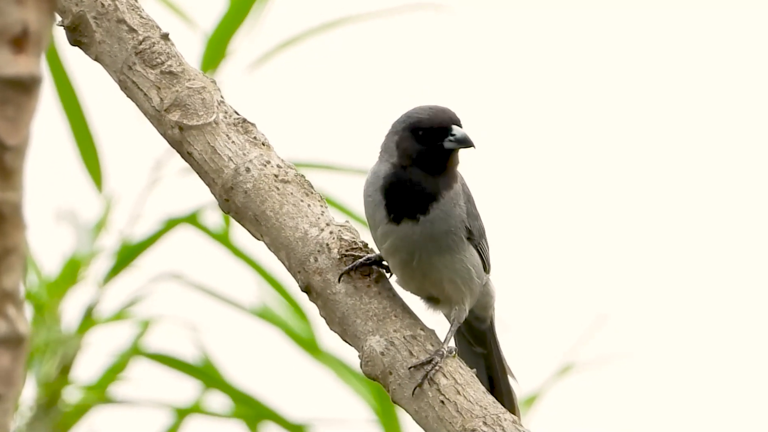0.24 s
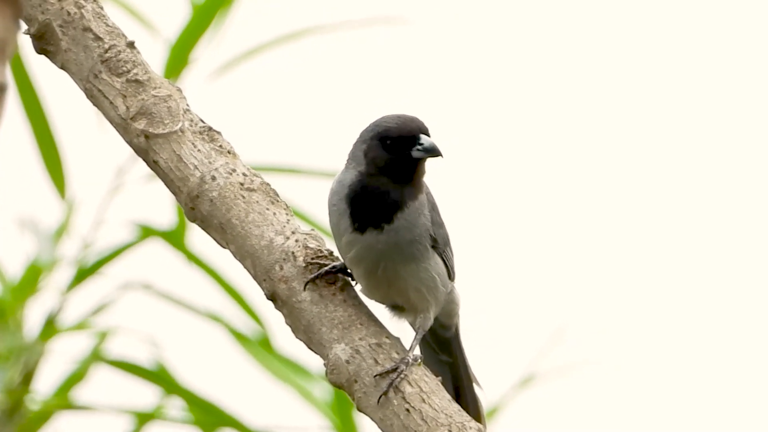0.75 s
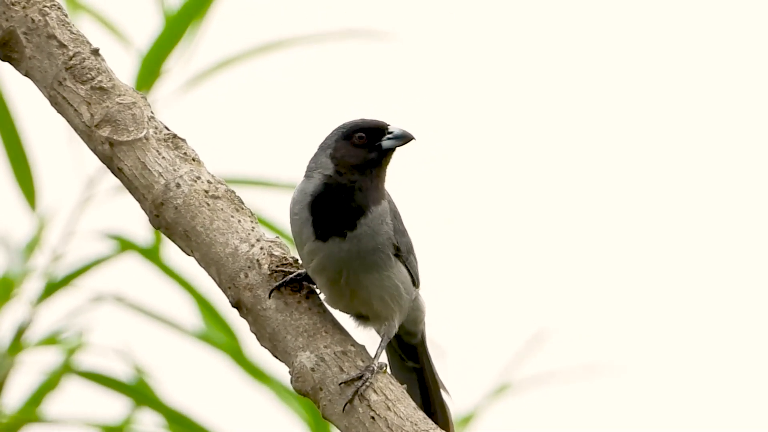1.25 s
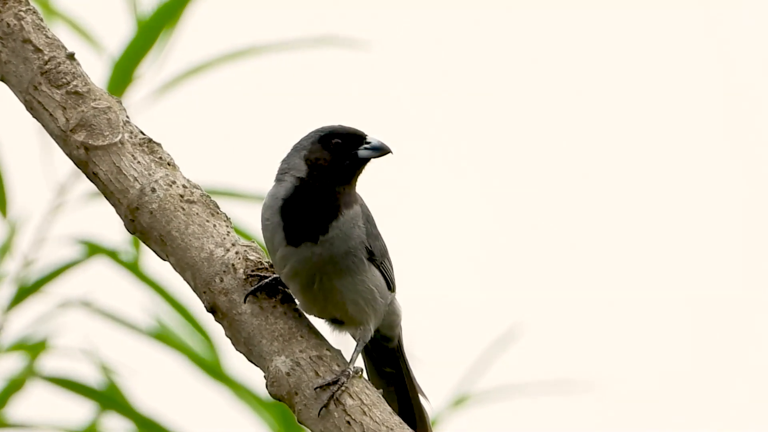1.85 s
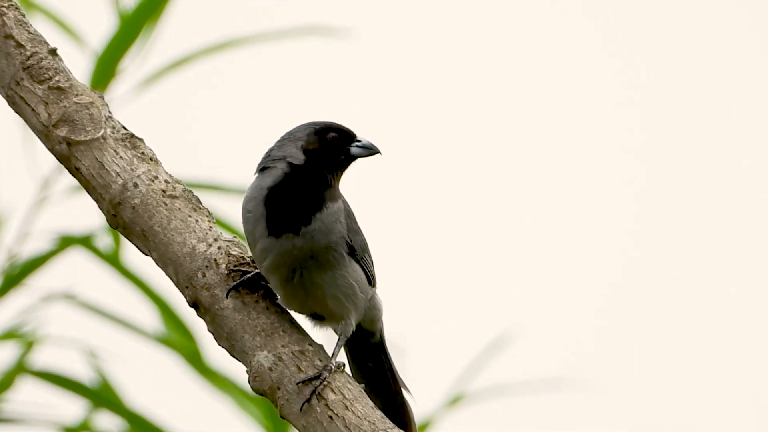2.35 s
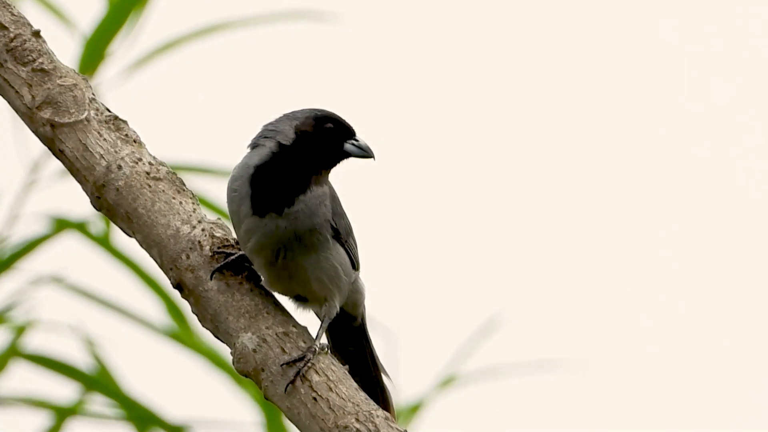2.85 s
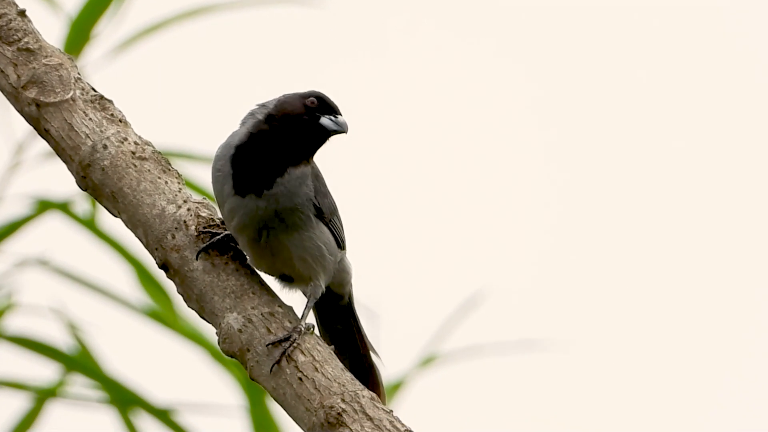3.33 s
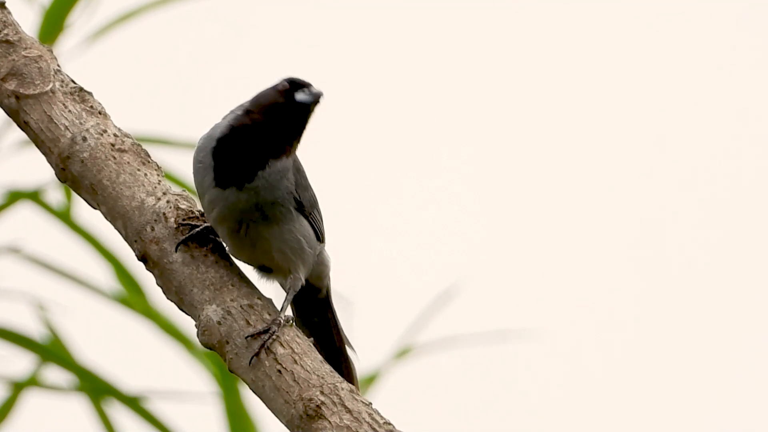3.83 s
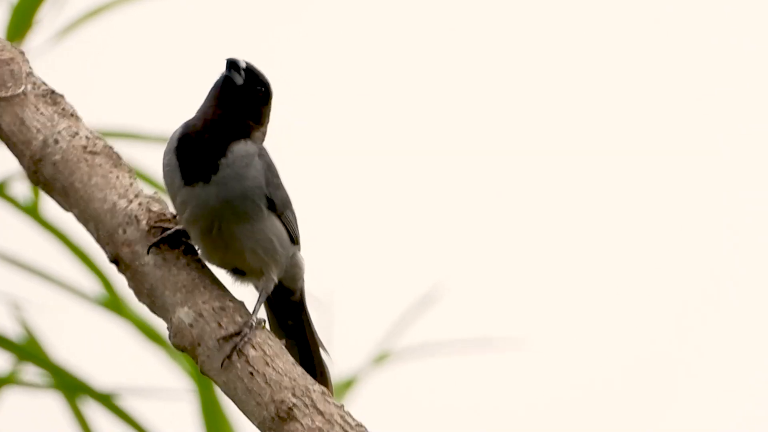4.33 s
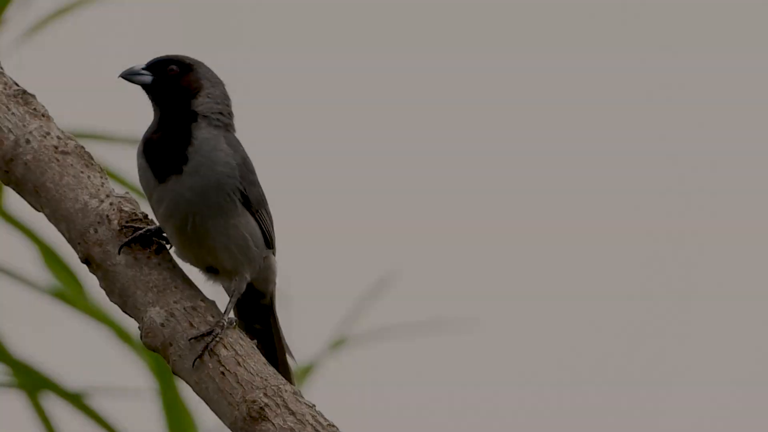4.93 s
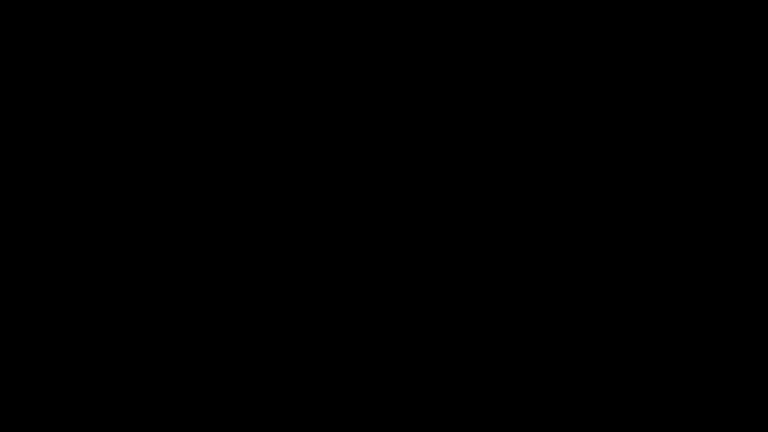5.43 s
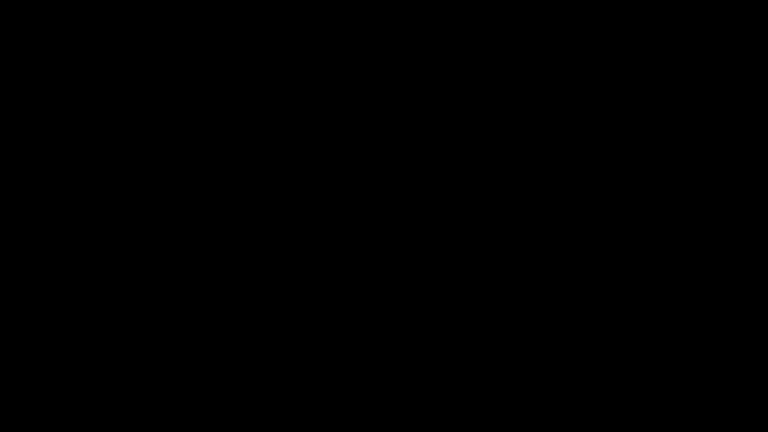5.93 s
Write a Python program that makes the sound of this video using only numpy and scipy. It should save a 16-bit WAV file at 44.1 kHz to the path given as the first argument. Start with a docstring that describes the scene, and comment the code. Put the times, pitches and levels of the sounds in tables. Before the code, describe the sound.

A small bird on the left whistles sweet gliding notes with tree echoes, framed by squawking, squeaking thicket chatter over insects and airy hiss.

```python
"""A small bird on a branch to the left whistles gliding near-sine notes, with echoes off the trees around it.
Before and after its song the left side has thicket sounds: hooked calls, whistles, squeaks, squawks, knocks.
Farther birds whistle, buzz and trill over pulsed-noise and whistled insects and coloured-noise air hiss;
the hiss changes abruptly on each side, and the loudest insect chorus fades away near the end."""
import sys
import numpy as np
from scipy import signal
from scipy.fft import rfft, irfft
from scipy.io import wavfile
from scipy.ndimage import uniform_filter1d

SR = 44100
rng = np.random.default_rng(int(sys.argv[2]) if len(sys.argv) > 2 else 0)


def generate_wav(sig):
    """Save sig (samples, or channels by samples) to the path in sys.argv[1] as 16-bit PCM at SR."""
    pcm = np.round(np.clip(np.atleast_2d(sig).T, -1, 1) * 32767).astype(np.int16)
    wavfile.write(sys.argv[1], SR, pcm)


N = 272538

GLADE_FROM_S, GLADE_TO_S = 1.232, 5.562  # left side: glade between these, thicket outside
RIGHT_CHANGE_S = 5.693
LEFT_LAG_SAMPLES = 2  # far field reaches the left later
OVERTONE_AT_HZ, OVERTONE_DB_PER_KHZ = 2100, -66


def near_bird():
    """Near-sine glides with a weak octave, echoed by the trees."""
    # song, a five-note motif comes twice: shape, start/s, time stretch, pitch ratio, peak/dB
    song_notes = [("climb", 1.312, 1.0, 1.0, -15), ("slide", 1.632, 1.0, 1.0, -17.5),
                  ("arch", 2.013, .945, 1.006, -13), ("low hop", 2.453, 1.01, 1.001, -19),
                  ("high hop", 2.594, .98, 1.004, -11.5), ("bow", 2.811, .825, 1.023, -12.5),
                  ("vee", 3.114, 1.0, 1.018, -9.5), ("lift", 3.343, 1.0, 1.0, -14.5),
                  ("dip", 3.507, 1.0, 1.0, -12.5), ("long slide", 3.721, 1.0, 1.0, -10),
                  ("arch", 4.113, 1.0, 1.0, -10), ("low hop", 4.591, 1.0, 1.0, -16.5),
                  ("high hop", 4.731, 1.02, .996, -8), ("bow", 4.908, 1.005, .997, -8),
                  ("vee", 5.252, 1.005, .985, -7.5)]
    # hard echoes: delay/s, level/dB
    echo_rows = [(.006, -12.5), (.03, -24), (.1, -33.5)]
    overtone_db = -34  # at OVERTONE_AT_HZ
    dry_song = whistle(sung(song_notes), .0025, overtone_db, wobble_hz=7)
    return trees(dry_song, -19.5, .55, echo_rows)


def thicket():
    """Calls, coos, chatter and squeaks scattered by leaves; squawks and knocks added dry."""
    # hooked calls: shape, start/s, time stretch, pitch ratio, peak/dB
    hook_notes = [("hook", .036, .7, 1.04, -33), ("hook", .41, 1.0, 1.0, -30.5)]
    # rough squeaks: centre t/s, first f/Hz, last f/Hz, length/s, level/dB
    squeak_rows = [(.158, 4000, 4850, .024, -35), (.35, 5750, 6150, .06, -35), (.41, 6400, 6800, .07, -40),
                   (.428, 7600, 9050, 0.066, -32), (.375, 11400, 13400, 0.093, -53),
                   (.438, 2000, 2750, .012, -33), (.925, 2900, 4500, .018, -35),
                   (.915, 5750, 6120, .06, -48), (1.222, 4900, 6200, .014, -35),
                   (5.571, 3600, 4150, .014, -38), (5.61, 4900, 4300, .025, -40),
                   (5.748, 4600, 3600, .03, -39), (5.768, 4200, 3100, .014, -34),
                   (5.795, 2850, 2650, 0.045, -36), (5.881, 2400, 4000, .016, -38)]
    calls = whistle(whistled("thicket") + sung(hook_notes), .006, wobble_hz=18)
    coo = whistle(whistled("low coo"), .02)
    voices = trees(calls + coo + chatter(), -6, .25)
    squeaks = trees(blips(squeak_rows, wobble_hz=60), -3, .2)
    return voices + squeaks + squawks() + knocks()


def squawks():
    """Harsh calls: narrow noise bands with fast random level, each ringing out exponentially."""
    # onset t/s, level before band sum/dB, T60/s
    bursts = [(.003, -15.5, .08), (.016, -24, .42), (5.565, -34, .2), (5.755, -32, .3)]
    # centre f/Hz, width/Hz, relative level/dB
    bands = [(3870, 420, 1), (4930, 400, 1), (5400, 350, -2.5), (5900, 400, -5)]
    rasp = sum(undb(db + 2.5 * walk(150)) * band(hz, width_hz) for hz, width_hz, db in bands) / 2
    return rasp * sum(decay(s, db, t60_s) for s, db, t60_s in bursts)


def chatter(count=330):
    """Many thin chirps of small birds, random in time, pitch, bend, length and level."""
    when, high, bend, long, loud = rng.random((count, 5)).T
    first_hz = 1700 * 2 ** (1.6 * high)
    last_hz = first_hz * (.7 + .55 * bend)
    length_s = .012 + .04 * long
    level_db = -53 + 8 * loud
    return blips(zip(when * N / SR, first_hz, last_hz, length_s, level_db), wobble_hz=20)


def knocks():
    """Soft knocks of twigs: bell-band noise with a short exponential decay."""
    # onset t/s, level/dB
    taps = [(.24, -41), (.653, -38)]
    t60_s = .07
    return band(1000, 700) * sum(decay(s, db, t60_s) for s, db in taps)


def far_birds():
    """Whistles, wide-vibrato buzzes, a trill of falling chips and lone rising chips; left, right."""
    # buzzes: start/s, end/s, first f/Hz, last f/Hz, level/dB
    buzz_rows = [(0, 0.245, 2960, 2404, -45), (0.352, 0.636, 2750, 2750, -48),
                 (0.734, 1.026, 3244, 2626, -48), (1.322, 1.606, 3110, 2440, -51.5)]
    # lone contact chips: centre t/s, first f/Hz, level/dB
    chip_rows = [(.849, 8150, -41.5), (2.047, 8300, -46), (2.907, 8480, -39.5), (3.86, 7800, -45.5)]
    chip_rise_hz, chip_s = 190, .016
    buzz_notes = [[(a, f, db), (b, g, db)] for a, b, f, g, db in buzz_rows]
    buzz = whistle(buzz_notes, .0081, swing_hz=390, wobble_hz=50)
    chips = blips([(s, hz, hz + chip_rise_hz, chip_s, db) for s, hz, db in chip_rows])
    buzz_and_trill = buzz + far_trill()
    whistles = whistle(whistled("field"), .005)
    left = (whistles + buzz_and_trill * undb(-3) + chips * undb(-8)) * (clock() < RIGHT_CHANGE_S)
    right = whistles + whistle(whistled("right"), .005) + buzz_and_trill + chips
    return np.array([trees(left, -8, .25), trees(right, -8, .2)])


def far_trill():
    """Short falling chips at even gaps, the first few longer; level swells and sinks."""
    start_s, gap_s, count = 1.849, .05, 17
    holdback_s, settle_chips = .023, 1.8
    from_hz, to_hz, length_s = 3560, 3050, .009
    k = np.arange(count)
    beats_s = start_s + gap_s * k + holdback_s * (1 - np.exp(-k / settle_chips))
    level_db = -42 + 5 * np.sin(np.pi * k / k[-1]).clip(0) ** .5
    return blips([(s, from_hz, to_hz, length_s, db) for s, db in zip(beats_s, level_db)])


def insects():
    """Chorus, plus cricket and warble one sample later on the left; left, right."""
    high = cricket() + warble() * (clock() < RIGHT_CHANGE_S)
    return chorus() + np.array([np.roll(high, LEFT_LAG_SAMPLES // 2), high])


def chorus():
    """Band noise pulsed at a slightly wandering rate; left is part shared, part its own noise."""
    # t/s, level before pulsing and left-side mix/dB
    level_rows = [(0, -40), (.1, -48), (.62, -44), (1.1, -47), (1.3, -41), (1.38, -47), (2.85, -45.5),
                  (3.35, -49), (3.6, -41.5), (3.9, -48), (4.2, -43), (4.5, -54.5), (4.85, -67)]
    centre_hz, width_hz, rate_hz = 4633, 640, 126
    beat = 2 * np.pi * np.cumsum(rate_hz * (1 + .02 * walk(3))) / SR
    swell = undb(curve(level_rows)) * (1 + .24 * np.cos(beat))
    shared = band(centre_hz, width_hz)
    left = .58 * np.roll(shared, LEFT_LAG_SAMPLES) + .69 * band(centre_hz, width_hz)
    return swell * np.array([left, shared])


def cricket():
    """Evenly spaced constant-pitch chirps with random level scatter."""
    start_s, period_s, count = 1.3155, .0507, 27
    pitch_hz, length_s = 6770, .015
    starts_s = start_s + period_s * np.arange(count)
    level_db = -51 + .61 * rng.standard_normal(count)
    return blips([(s, pitch_hz, pitch_hz, length_s, db) for s, db in zip(starts_s, level_db)])


def warble():
    """Steady high FM tone, loudest at the top of each swing, cut off at the bottom."""
    rate_hz, centre_hz, swing_hz = 68.4, 8950, 590
    turn = np.cos(2 * np.pi * rate_hz * clock() + .13 * walk(3.4))
    pitch_hz = centre_hz + swing_hz * turn + 40 * walk(200)
    level_db = -60.5 + 2.5 * turn + 1.2 * walk(300)
    gate = np.clip(3 * (turn + 1), 0, 1)
    return np.sqrt(2) * undb(level_db) * gate * np.sin(2 * np.pi * np.cumsum(pitch_hz) / SR)


def side_hiss():
    """Coloured noise that switches abruptly: left thicket/glade/thicket, right air/breeze."""
    # colours: f/Hz, density/(dB per Hz)
    thicket_colour = [(30, -105), (70, -85), (200, -91.5), (400, -80.5), (1400, -83.5), (1650, -73.5),
                      (5800, -78.5), (6200, -86), (6600, -75.5), (8400, -84.5), (9100, -75), (9800, -94),
                      (10600, -104), (15500, -105)]
    glade_colour = [(300, -114), (1200, -88), (2200, -77.5), (3000, -79), (3550, -70.5), (4100, -84.5),
                    (6000, -95), (10200, -104), (10700, -125)]
    air_colour = [(30, -119), (65, -98), (300, -96), (1800, -94.5), (5600, -101), (6700, -90), (7700, -103),
                  (10200, -101), (10700, -125)]
    breeze_colour = [(400, -120), (1500, -90), (3400, -83.5), (5000, -88), (10000, -90.5), (15500, -96.5)]
    left = np.where(in_glade(), hiss(glade_colour), hiss(thicket_colour))
    right = np.where(clock() < RIGHT_CHANGE_S, hiss(air_colour), hiss(breeze_colour))
    return np.array([left, right])


def field_hiss():
    """Far-field noise, partly shared by both sides, that fades late."""
    # colour before fade and left-side mix: f/Hz, density/(dB per Hz)
    field_colour = [(1000, -110), (2000, -90), (3500, -97), (6400, -90.5), (7700, -98), (10300, -101),
                    (13500, -108), (15500, -118)]
    # fade: t/s, gain/dB
    fade_rows = [(4.2, 7.5), (4.75, -9), (5.2, -36)]
    shared = hiss(field_colour)
    left = .32 * np.roll(shared, LEFT_LAG_SAMPLES) + .5 * hiss(field_colour)
    return undb(curve(fade_rows)) * np.array([left, shared])


def sung(notes):
    """Place note shapes: stretch, transpose, set peak level."""
    # by name, rows of: t from note start/s, f/Hz, level re peak/dB
    shapes = { "climb": [(0, 2215, -25), (.042, 2147, -15.5), (.08, 2320, -8), (.151, 2840, -1.5),
              (.192, 3090, 0), (.204, 3020, -15)], "slide": [(0, 3045, -24), (.008, 3020, -14),
              (.059, 2650, -1), (.123, 2392, 0), (.212, 2017, -11)], "arch": [(0, 1395, -34),
              (.026, 2100, -22), (.041, 2260, -10), (.073, 2530, -1), (.11, 2720, 0), (.188, 3000, -3),
              (.228, 3065, -4.5), (.29, 2840, -0.5), (.314, 2715, -16)], "low hop": [(0, 1800, -22),
              (.034, 2076, 0), (.051, 2045, -1), (.09, 1740, -17)], "high hop": [(0, 2720, -13),
              (.017, 3015, -8), (.038, 2950, 0), (.066, 2570, -4), (.085, 2310, -27)],
              "bow": [(0, 2385, -17), (.036, 2412, -0.8), (.097, 2501, -1.5), (.155, 2380, -0.5),
              (.18, 2290, -5.5), (.232, 2075, -14), (.247, 2050, -11)], "vee": [(0, 3250, -12),
              (.009, 3530, -16), (.022, 3350, -9), (.038, 2880, -1.5), (.054, 2590, -1.5), (.074, 3060, 0),
              (.088, 3190, -3), (.097, 3130, -15)], "lift": [(0, 1947, -21), (.034, 1972, -7.5),
              (.086, 2205, 0), (.116, 2372, -4.5), (.125, 2410, -25)], "dip": [(.002, 2480, -18),
              (.016, 2790, 0), (.028, 2693, -4), (.042, 2310, -4.5), (.051, 1786, -29), (.061, 1810, -22),
              (.076, 2730, -4), (.087, 2970, -3), (.138, 3148, -1), (.15, 3163, -33)],
              "long slide": [(0, 3030, -20), (.043, 2690, -2.5), (.1, 2393, 0), (.153, 2160, -11),
              (.253, 1900, -18)], "hook": [(0, 1840, -10), (.035, 2300, 0), (.06, 2090, -1),
              (.11, 1816, -4), (.22, 1654, -12)]}
    return [[(start + s * stretch, hz * ratio, db + peak_db) for s, hz, db in shapes[shape]]
            for shape, start, stretch, ratio, peak_db in notes]


def whistled(place):
    """Whistles of one place or voice: swell to the turn, fade after it."""
    # place or voice, start/s, turn/s, end/s, first f/Hz, turn f/Hz, last f/Hz, peak/dB
    whistle_rows = [ ("thicket", .16, .165, .19, 3900, 3880, 3800, -33),
                    ("low coo", .15, .33, .4, 582, 575, 570, -51),
                    ("thicket", .79, .83, .85, 1780, 1950, 2050, -42),
                    ("thicket", .645, .65, .67, 1870, 1900, 1970, -34),
                    ("thicket", 1.12, 1.18, 1.2, 1716, 1900, 1996, -38),
                    ("thicket", 5.63, 5.7, 5.72, 1650, 1950, 2035, -41),
                    ("thicket", 5.65, 5.7, 5.73, 3400, 4200, 4600, -42),
                    ("thicket", 5.84, 5.85, 5.87, 5550, 5100, 4400, -42),
                    ("thicket", 5.915, 5.94, 5.99, 5000, 3700, 2980, -37),
                    ("thicket", 5.97, 5.988, 6.0, 4850, 4650, 4550, -42),
                    ("thicket", 6.06, 6.09, 6.1, 2830, 3050, 3120, -38),
                    ("thicket", 6.07, 6.1, 6.13, 1700, 1850, 1920, -40),
                    ("thicket", 6.11, 6.125, 6.14, 3770, 3750, 3740, -39),
                    ("thicket", 6.15, 6.16, 6.178, 3900, 3500, 2790, -37),
                    ("thicket", 6.13, 6.16, 6.18, 5400, 4750, 4400, -41),
                    ("field", .07, .12, .13, 4880, 4820, 4800, -41.5),
                    ("right", .27, .34, .36, 4970, 4800, 4770, -40),
                    ("right", .41, .5, .52, 6700, 5750, 5580, -47),
                    ("field", .66, .76, .8, 6450, 6650, 6250, -46),
                    ("field", .8, .87, .885, 6250, 5720, 5680, -43),
                    ("field", .975, 1.0, 1.035, 5450, 5090, 5080, -39),
                    ("right", 1.11, 1.15, 1.19, 2490, 3500, 2970, -46),
                    ("field", 1.715, 1.745, 1.785, 2790, 3430, 3130, -43.5),
                    ("right", 5.8, 5.834, 5.884, 1774, 1960, 1950, -40.5),
                    ("right", 5.972, 6.0, 6.125, 3240, 2920, 1884, -25),
                    ("right", 6.01, 6.096, 6.124, 5600, 4230, 3800, -45)]
    swell_db, fall_db_per_s = 8, 125
    return [[(a, f, db - swell_db), (b, g, db), (c, h, db - fall_db_per_s * (c - b))]
            for where, a, b, c, f, g, h, db in whistle_rows if where == place]


def whistle(notes, edge_s, overtone_db=-np.inf, swing_hz=0, wobble_hz=0):
    """Near-sine notes: integrated pitch, soft edges, optional vibrato and random pitch wobble."""
    vibrato_hz = 112
    out, wobble = np.zeros(N), walk(300)
    for note in notes:
        s, hz, db = np.transpose(note)
        first = max(int((s[0] - edge_s) * SR), 0)
        last = min(int((s[-1] + edge_s) * SR), N)
        at = np.arange(first, last)
        t = at / SR
        vibrato = swing_hz * np.sin(2 * np.pi * vibrato_hz * t)
        pitch_hz = glide(t, s, hz) + vibrato + wobble_hz * wobble[at]
        phase = 2 * np.pi * np.cumsum(pitch_hz) / SR
        edge = np.clip(np.minimum(t - s[0], s[-1] - t) / (2 * edge_s) + .5, 0, 1)
        # sqrt(2): levels are rms
        loud = np.sqrt(2) * undb(np.interp(t, s, db)) * np.sin(np.pi / 2 * edge) ** 2
        # lower pitch, stronger octave
        octave = undb(overtone_db + OVERTONE_DB_PER_KHZ * (pitch_hz - OVERTONE_AT_HZ) / 1e3)
        out[at] += loud * (np.sin(phase) + octave * np.sin(2 * phase))
    return out


def blips(rows, wobble_hz=0):
    """Short glides from rows of centre t/s, first f/Hz, last f/Hz, length/s, level/dB."""
    notes = [[(s - d / 2, a, db), (s + d / 2, b, db)] for s, a, b, d, db in rows]
    return whistle(notes, .0019, wobble_hz=wobble_hz)


def glide(t, s, hz):
    """Smooth cubic through (s, hz), level at interior turning points."""
    step = np.diff(hz) / np.diff(s)
    before, after = np.r_[step[0], step], np.r_[step, step[-1]]
    # harmonic mean of neighbouring slopes, zero where they differ in sign
    slope = np.where(before * after > 0, 2 * before * after / (before + after + 1e-9), 0)
    k = np.clip(np.searchsorted(s, t) - 1, 0, len(s) - 2)
    gap = np.diff(s)[k]
    u = np.clip((t - s[k]) / gap, 0, 1)
    bow = (slope[k] - step[k]) * (1 - u) - (slope[k + 1] - step[k]) * u
    return hz[k] + gap * u * (step[k] + bow * (1 - u))


def trees(x, wet_db, t60_s, echoes=()):
    """Direct sound, hard echoes and a diffuse tail scattered by trunks and leaves."""
    t = np.arange(SR // 2) / SR
    tail = rng.standard_normal(len(t)) * undb(-60 * t / t60_s)
    path = undb(wet_db) * tail / np.sqrt(np.sum(tail ** 2))
    path[0] = 1
    for delay_s, db in echoes:
        path[int(delay_s * SR)] += undb(db)
    return signal.fftconvolve(x, path)[:N]


def decay(s, db, t60_s):
    """Abrupt onset at s, then exponential decay of 60 dB per t60_s."""
    t = clock()
    return (t >= s) * undb(db - 60 * np.maximum(t - s, 0) / t60_s)


def band(hz, width_hz):
    """Noise of rms 1 in a bell-shaped band."""
    bell = np.exp(-2 * ((np.fft.rfftfreq(N, 1 / SR) - hz) / width_hz) ** 2)
    x = irfft(rfft(rng.standard_normal(N)) * bell, N)
    return x / np.std(x)


def hiss(colour, flicker_db=.4):
    """Noise shaped in log frequency, with a gentle level flicker."""
    hz, db = np.transpose(colour)
    log_hz = np.log(np.maximum(np.fft.rfftfreq(N, 1 / SR), 1))
    gain = undb(np.interp(log_hz, np.log(hz), db)) * np.sqrt(SR / 2)
    return irfft(rfft(rng.standard_normal(N)) * gain, N) * undb(flicker_db * walk(9))


def walk(rate_hz):
    """Random values held 1 / rate_hz and smoothed twice; spread near 1."""
    k = int(SR / rate_hz)
    held = np.repeat(rng.standard_normal(N // k + 1), k)
    return 1.9 * uniform_filter1d(uniform_filter1d(held, k), k)[:N]


def curve(rows):
    """Straight lines through (t/s, value) rows."""
    return np.interp(clock(), *np.transpose(rows))


def undb(db):
    """Gain of a level in dB."""
    return 10 ** (np.asarray(db) / 20)


def clock():
    """Time of every sample, s."""
    return np.arange(N) / SR


def in_glade():
    """True while the left side is the glade."""
    t = clock()
    return (t > GLADE_FROM_S) & (t < GLADE_TO_S)


def scene():
    """Near bird or thicket on the left, far birds, insects and hiss on both sides."""
    left = np.where(in_glade(), near_bird(), thicket())
    near = np.array([left, np.zeros(N)])
    return near + far_birds() + insects() + side_hiss() + field_hiss()


def record(dry):
    """Steep elliptic low-pass over both channels."""
    top_hz = 15600
    return signal.sosfilt(signal.ellip(10, .2, 80, top_hz, fs=SR, output="sos"), dry)


dry = scene()
out = record(dry)
generate_wav(out)
```